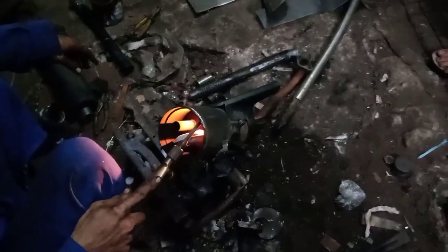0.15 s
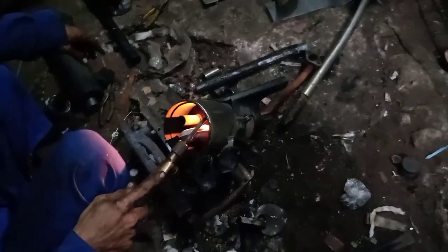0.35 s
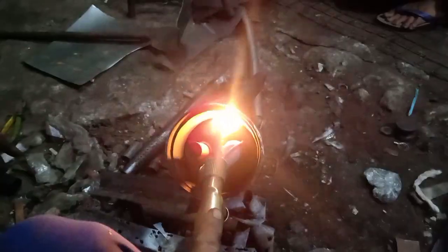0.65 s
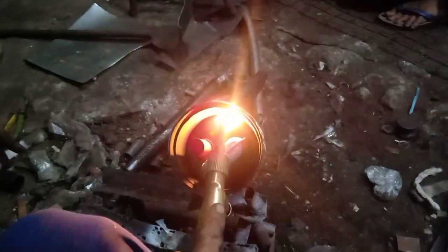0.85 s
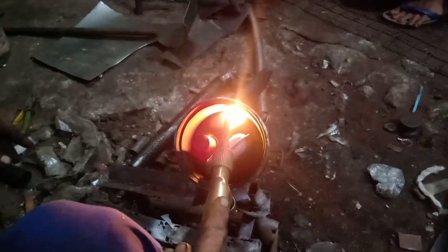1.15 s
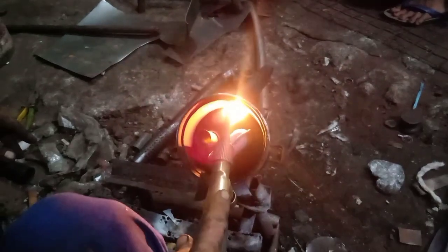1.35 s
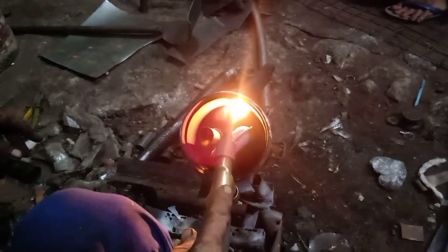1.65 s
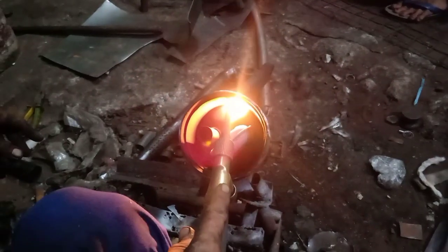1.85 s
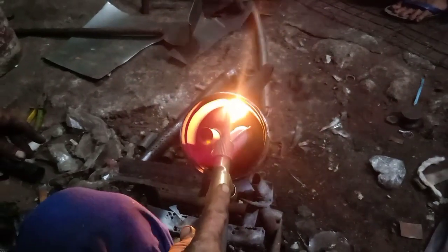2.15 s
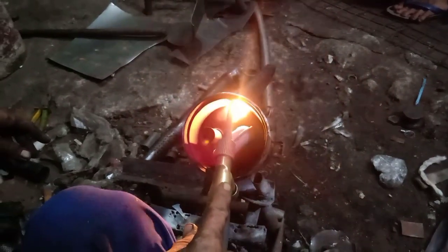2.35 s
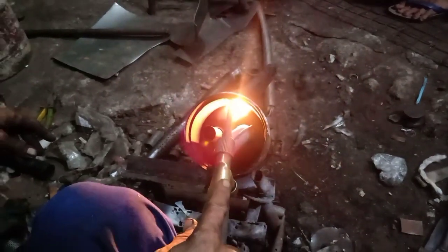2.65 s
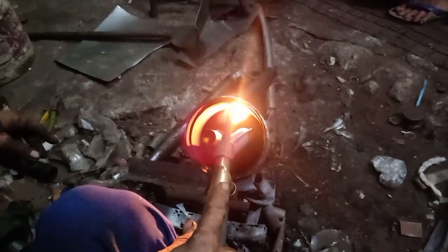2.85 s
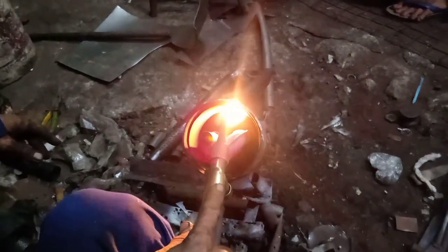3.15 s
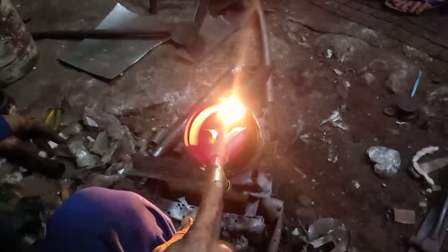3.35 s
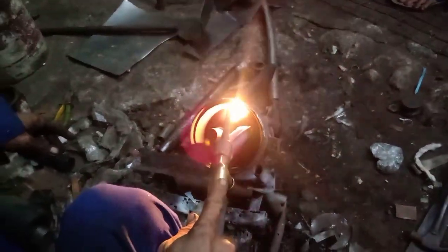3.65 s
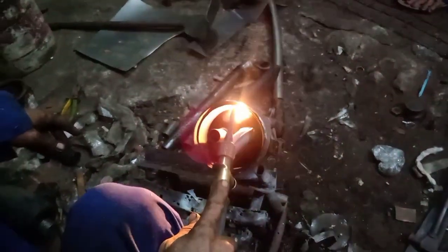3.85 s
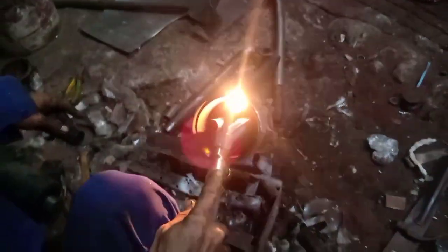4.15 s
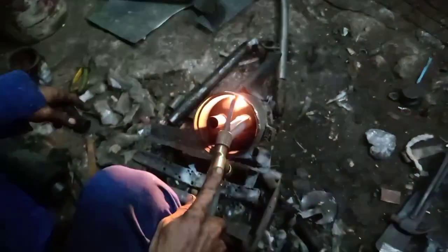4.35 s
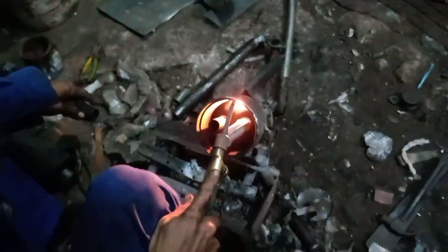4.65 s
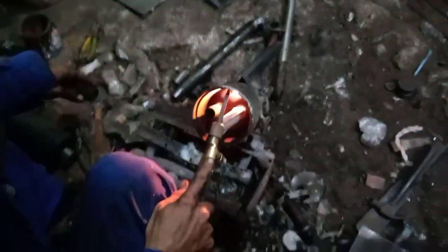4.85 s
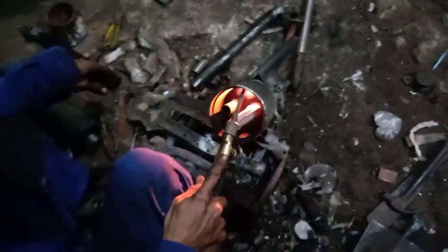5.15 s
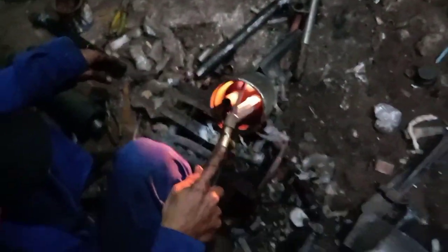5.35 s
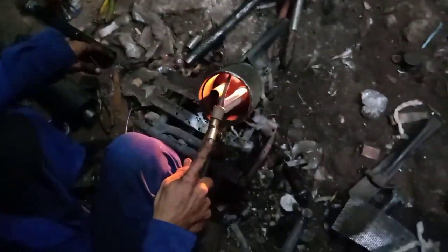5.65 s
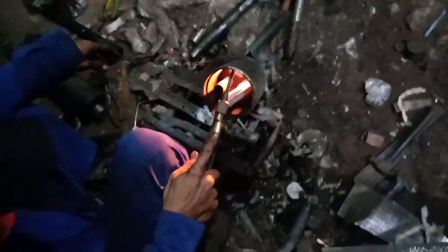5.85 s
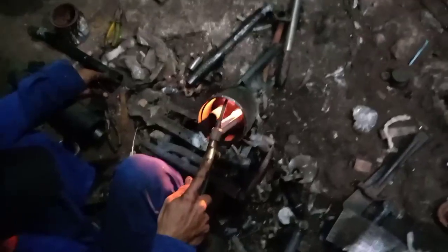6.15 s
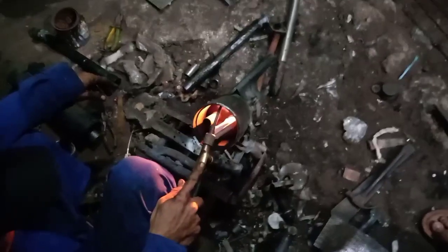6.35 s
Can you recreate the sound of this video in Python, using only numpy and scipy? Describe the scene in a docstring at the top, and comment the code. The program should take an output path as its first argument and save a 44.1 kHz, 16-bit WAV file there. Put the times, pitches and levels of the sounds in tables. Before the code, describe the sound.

Hard hammer blows on a pipe begin almost at once and continue to the end, cracking, ringing briefly and shaking loose sheet metal, with a quick wall echo. Behind them a nearby torch hisses and resonates inside a can, stronger after an abrupt change near 0.7 seconds, softer later. A faint low drone swells beneath; a stereo microphone hears the small hard workshop.

```python
"""A hammer beats a steel pipe among loose sheet metal, a few metres from a stereo microphone. Each blow is
a sharp sine crack, a wall's answer, decaying modes of pipe, sheet and bench, and a clatter of fading noise.
Close by, a gas torch blows into an open steel can: noise through the can's hollow resonances, with jet and
nozzle hiss above. Narrow bands of noise make a low drone with a broad hum under it all. Torch and drone dip
just before some blows. A light tick and, later, a soft low knock of two modes are decaying sines."""
import sys
import numpy as np
from scipy import signal
from scipy.fft import rfft, irfft, next_fast_len
from scipy.io import wavfile
from scipy.ndimage import uniform_filter1d, map_coordinates

SR = 44100
rng = np.random.default_rng(int(sys.argv[2]) if len(sys.argv) > 2 else 0)


def dump(signal):
    """Clip the signal to [-1, 1] and save it as 16-bit WAV at the path in sys.argv[1]."""
    limited = np.clip(np.atleast_2d(signal).T, -1, 1)
    pcm = np.round(limited * 32767).astype(np.int16)
    wavfile.write(sys.argv[1], SR, pcm)


N = 286209

# Hammer blows: start_s, crack_db, crack_hz, wall_db (the wall's answer), clatter_db, body_db, thud_db, ring_db,
# spot (struck place, share of the pipe's length), hardness_db_per_octave (tilt of the ring)
HAMMER_BLOWS = [(0.256, 1, 2280, -14, -13, -19.5, -23, -17, 0.23, 1),
                (0.638, -4.5, 2410, -13, -19.5, -27, -38.5, -15, 0.405, 2),
                (0.9667, -11, 2246, -6.5, -10.5, -18, -25.5, -12.5, 0.43, -2.5),
                (1.3457, -9.5, 2110, -9, -11.5, -21.5, -29.5, -12.5, 0.37, -2),
                (1.918, -10, 2090, -21, -11, -18, -21.5, -14.5, 0.37, -1),
                (2.3214, -20, 2130, -10, -10.5, -19, -21, -16.5, 0.42, 5.5),
                (2.7176, -7, 1643, -5, -14.5, -18, -21, -17, 0.35, -0.3),
                (3.068, -10, 1630, -5.5, -13, -18, -21.5, -18, 0.24, 3),
                (3.496, -4.5, 1704, -6, -11.5, -18, -22.5, -16, 0.2, 6.5),
                (4.197, -6, 2200, -5.5, -14, -22, -28, -15.5, 0.18, 3.5),
                (4.623, -9, 2370, -12, -13.5, -23, -28, -11.5, 0.15, -3),
                (5.0161, -9.5, 1750, -24, -15, -21.5, -30, -16.5, 0.33, -3),
                (5.4335, -4, 1902, -9, -13, -18.5, -24.5, -14, 0.43, -2),
                (5.851, -6.5, 1780, -8, -13.5, -15.5, -26.5, -17.5, 0.27, 2.5),
                (6.249, 0, 2130, -10.5, -13, -19.5, -25, -14.5, 0.3, -1)]
# Modes of the struck pipe: mode_hz, level_db, t60_s, phase_wander_rad
PIPE_MODES = [(928, -3.5, 0.23, 0.52), (2229, 0.5, 0.27, 1.3), (3017, -3, 0.24, 1.25),
              (3866, -12.5, 0.26, 1.5), (4857, -8, 0.22, 0.23), (5767, -19, 0.24, 2.5)]
# Modes of the loose sheet: mode_hz, level_db (over the body)
SHEET_MODES = [(326, -12), (612, -17.5), (671, -10.5), (1590, -8.5), (13840, -35)]
# What the pipe rests on, two rings and a short thump: mode_hz, level_db (over the thud), t60_s
BENCH_MODES = [(191.8, -3, 0.38), (216, 0, 0.058), (227, -10.5, 0.41)]
# Loose metal in the shop, four ranges, each a t60_s and a spectrum of: frequency_hz, density_db (per Hz)
THUD_RANGE = 0.24, [(80, -74), (150, 0), (215, -1), (280, -3.5), (420, -32)]
BODY_RANGE = 0.31, [(190, -27), (340, -8.5), (700, -8.5), (1250, -10.5), (1700, -96)]
CLATTER_RANGE = 0.24, [(900, -21), (1650, 4), (2250, 0), (3150, -8), (3450, -19.5), (4500, -67)]
TREBLE_RANGE = 0.27, [(2800, -63), (3600, -0.5), (5000, 0.5), (6200, -7), (9700, -28), (13500, -10.5),
                (16000, -39)]
# A light tick, the hammer grazing the pipe before a blow, then a soft low knock of two modes, something soft
# set down far off; each row is one decaying mode: start_s, pitch_hz, level_db, attack_s, t60_s
LIGHT_KNOCKS = [(1.913, 2030, -19, 0.00074, 0.023), (6.439, 456, -30, 0.011, 0.12),
                (6.446, 312, -34, 0.012, 0.13)]
# How hard the torch blows: time_s, jet_level_db
TORCH_JET = [(0.02, -45), (0.4, -47), (0.52, -40), (0.62, -47.5), (0.69, -35.5), (0.755, -34), (0.775, -43),
             (0.825, -37), (0.85, -30.5), (0.94, -36), (1.16, -36), (1.19, -42.5), (1.22, -35.5),
             (1.33, -36), (1.56, -41), (1.95, -38), (3.05, -39), (3.36, -37), (4.16, -43.5), (5.3, -47),
             (5.64, -44.5), (5.82, -49.5), (6.05, -49.5), (6.21, -45.5), (6.47, -49.5)]
# Nozzle hiss: time_s, level_db (over the jet)
NOZZLE_HISS = [(0, -7.5), (0.85, -7), (2.1, -5.5), (3.6, -2.5), (4.4, -6.5), (6.47, -5)]
# The can's song as the flame's place changes: time_s, roar_db (at the usual jet level),
# upper_db (lift of the upper notes over the roar), strongest_note_hz, top_note_db (lift over the upper notes)
CAN_SONG = [(0, -31, 1.5, 2158, 4), (0.6, -34, 0, 2137, 0.5), (0.9, -36, 4, 2100, 1.5),
            (1.6, -36, 4.5, 2126, 3.5), (2.2, -38, 4, 2151, 3.5), (3.9, -33.5, -1, 2170, 3),
            (4.6, -33.5, 3.5, 2157, 1), (5.7, -33, -1.5, 2140, 6.5), (6.1, -27.5, 2.5, 2124, 2.5)]
# Air modes of the can: mode_hz, width_hz, level_db
CAN_MODES = [(741, 30, -6), (964, 265, -3.5), (1153, 59, -1.5), (1842, 56, -4), (2154, 162, 5),
             (2850, 77, -18)]
# Spectra of the flame's broad roar, the jet and the nozzle: frequency_hz, density_db (per Hz)
FLAME_SPECTRUM = [(200, -14.5), (600, -19), (1500, -14), (3000, -9.5), (4500, -65)]
JET_SPECTRUM = [(2600, -65), (3500, -4), (4550, -7), (4780, 0.5), (5150, -2.5), (6000, -0.5), (6600, -7),
                (9800, -28)]
NOZZLE_SPECTRUM = [(6500, -64), (8300, -3.5), (9800, -8.5), (11300, -0.5), (13800, 0.5), (16000, -2)]
# Swells of the drone: time_s, low_tone_db, high_tone_db
DRONE_LEVELS = [(0.0, -52, -74), (1.01, -43, -45.5), (1.21, -75, -68), (1.45, -45, -64), (2.08, -55.5, -51),
                (3.988, -49, -66), (5.25, -75, -52), (6.49, -49, -66)]
# The drone's fuzzy tones: pitch_hz, width_hz
DRONE_TONES = [(74.5, 2.5), (98, 26)]
# Spectrum of the broad hum: frequency_hz, density_db (per Hz)
HUM_SPECTRUM = [(42, -56), (56, -4.5), (190, 1.5), (330, -21.5), (500, -32.5)]
# Dips of torch and drone: start_s (of the blow), depth_db
BACKGROUND_DIPS = [(0.634, -12.5), (1.347, -6), (4.198, -8.5), (5.015, -7.5), (5.428, -8.5), (6.249, -6.5)]
# Stereo width of the noises: frequency_hz, likeness (left-right correlation)
STEREO_LIKENESS = [(60, 0.97), (300, 0.95), (640, 0.5), (1400, 0.0033), (15000, 0.0074)]
# Colour of the microphone pair: frequency_hz, left_over_right_db
PAIR_COLOUR = [(200, -0.5), (1000, 1), (2400, 2), (4500, -5.5), (8500, 1), (14000, -1.5)]

CUT_SHORT_S = .668  # the sound of the second blow breaks off abruptly here
AT_NODE = 0.27  # share of a mode's swing that a blow on its node still wakes
DETUNE = 0.0024  # typical share by which the pipe's modes shift with the grip, from blow to blow
LOW_SWELLS_S = 0.019  # build-up time constant of the pipe's lowest mode
SHEET_T60_S, SHEET_VARIES_DB = 0.32, 3.5  # decay; typical spread from blow to blow
TREBLE_DB, SPLASH_DB = -1.5, 5  # treble over the high modes; splash over the treble
UPPER_HZ, TOP_NOTE_HZ = 1600, 2560  # where the can's upper notes and its top note begin
USUAL_JET_DB = -38
ROAR_FOLLOWS, UPPER_FOLLOWS = 0.68, 0.6  # dB of roar, and further dB of upper notes, per dB of jet
TOP_HZ = 15600  # nothing passes above this


def amp(db):
    """Gain of a level in dB."""
    return 10 ** (np.asarray(db) / 20)


def unit(x):
    """Scale to rms 1."""
    return x / np.sqrt(np.mean(x ** 2) + 1e-20)


def along(points, hz):
    """Read (Hz, value) points on a log frequency axis."""
    f, value = np.transpose(points)
    return np.interp(np.log(hz + 1), np.log(f + 1), value)


def curves(rows):
    """One value per sample for each column after the time."""
    s, *columns = np.transpose(rows)
    return [np.interp(np.arange(N) / SR, s, column) for column in columns]


def wobble(rate, channels=1):
    """Smooth random curves, rate knots a second."""
    knots = rng.standard_normal((channels, int(N * rate / SR) + 4))
    return np.array([map_coordinates(k, [np.arange(N) * rate / SR]) for k in knots])


def filtered(x, response):
    """Multiply the spectrum of x by a function of frequency."""
    m = next_fast_len(x.shape[-1] + 8192)
    spectrum = rfft(x, m) * response(np.fft.rfftfreq(m, 1 / SR))
    return irfft(spectrum, m)[..., :x.shape[-1]]


def shaped(spectrum):
    """Gain against frequency from (Hz, dB) points."""
    return lambda hz: amp(along(spectrum, hz))


def rush(gain, patchy_db, size=8):
    """Stereo noise of rms 1, coloured by gain(hz), with random louder and softer patches size frames long."""
    z = signal.stft(rng.standard_normal((2, N)), nperseg=512)[2]
    across_hz = uniform_filter1d(rng.standard_normal(z.shape[1:]), size=4, axis=0)
    patches = uniform_filter1d(across_hz, size=size, axis=1)
    pair = signal.istft(z * amp(patchy_db * unit(patches)), nperseg=512)[1][:, :N]

    def mid_side_gain(hz):
        # this split of mid and side gives the wanted likeness
        turn = np.arccos(np.clip(along(STEREO_LIKENESS, hz), -1, 1)) / 2
        return gain(hz) * [np.cos(turn), np.sin(turn)]

    mid, side = filtered(pair, mid_side_gain)
    return unit(np.array([mid + side, mid - side]))


def late_falling_db(t, t60):
    """Clatter and sheet fade slowly at first, then faster."""
    return -60 * (t / t60) ** 1.168


def crack_and_wall(t, lags, late, crack_db, crack_hz, wall_db):
    """A sine under a sharp pulse, answered by a wall that smears it."""
    def crack(u, life):
        return np.sin(2 * np.pi * crack_hz * u) * (u / life * np.exp(1 - u / life)) ** 3

    direct = amp(crack_db) * crack(np.maximum(t - lags[:, :1], 0), 0.00081)
    return direct + amp(wall_db) * crack(late, 0.0015)


def pipe_strength_db(ring_db, spot, hard):
    """Level of each pipe mode: weak when struck near its node, tilted by the hardness of the contact."""
    hz, mode_db = np.transpose(PIPE_MODES)[:2, :, None]
    order = np.arange(len(PIPE_MODES))[:, None] + 1
    woken = np.sin(np.pi * order * spot) ** 2 + AT_NODE ** 2
    return ring_db + mode_db + hard * np.log2(hz / hz[1]) + 10 * np.log10(woken)


def pipe_ring(t, strength_db, early):
    """Pipe modes roughened by room echoes: their size and phase wander, the two sides a quarter turn apart."""
    hz, _, t60, wander = np.transpose(PIPE_MODES)[..., None]
    knots = rng.standard_normal((2, 2, len(PIPE_MODES), 40))
    size, turn = np.apply_along_axis(lambda k: np.interp(t, np.linspace(0, t[-1], len(k)), k), -1, knots)
    eighth_turns = np.array([[[np.pi / 4]], [[-np.pi / 4]]])
    apart = rng.choice([-1, 1], (len(PIPE_MODES), 1)) * eighth_turns
    swing = amp(5.4 * size)
    # the wander leaves each mode's early strength alone
    swing /= np.sqrt(np.mean(swing[..., early] ** 2, axis=(0, 2), keepdims=True))
    shifted_hz = hz * (1 + DETUNE * rng.standard_normal(hz.shape))
    level = amp(strength_db - 60 * (t / t60) ** 1.27)
    modes = swing * level * np.sin(2 * np.pi * shifted_hz * t + apart + wander * turn)
    modes[:, 0] *= 1 - np.exp(-t / LOW_SWELLS_S)
    return modes.sum(1) * (1 - np.exp(-t / 0.00048))


def clatter(t, fill, at, levels_db, ranges, early):
    """Loose metal: noise in four ranges that fills up and fades, with a bright splash of steel on steel."""
    sound = 0
    for db, (t60, noise) in zip(levels_db, ranges):
        piece = noise[:, at:at + len(t)]
        sound = sound + amp(db + late_falling_db(t, t60)) * fill * piece / np.std(piece[:, early])
    treble_db, treble_noise = levels_db[-1], ranges[-1][1]
    splash = treble_noise[:, at + SR // 2:at + SR]  # a later stretch of the treble noise
    return sound + amp(treble_db + SPLASH_DB - 60 * t / 0.052) * fill * splash


def sheet(t, fill, body_db):
    """Sheet modes, shaken differently by every blow and heard in another phase on each side."""
    hz, mode_db = np.transpose(SHEET_MODES)[..., None]
    luck = rng.standard_normal((3, len(SHEET_MODES), 1))
    level_db = body_db + mode_db + SHEET_VARIES_DB * luck[0] + late_falling_db(t, SHEET_T60_S)
    modes = amp(level_db) * np.sin(2 * np.pi * hz * t + 1.13 * luck[1:])
    return fill * modes.sum(1)


def bench(t, thud_db):
    """Decaying low modes of what the pipe rests on."""
    hz, db, t60 = np.transpose(BENCH_MODES)[..., None]
    modes = amp(thud_db + db - 60 * t / t60) * np.sin(2 * np.pi * hz * t)
    return modes.sum(0) * (1 - np.exp(-t / 0.0026))


def hammer():
    """Each blow cracks, echoes off a wall, rings pipe, sheet and bench, and sets the shop clattering."""
    out, t = np.zeros((2, N + SR)), np.arange(SR // 2) / SR
    early = slice(0, SR // 20)
    ranges = []
    for t60, spectrum in (CLATTER_RANGE, THUD_RANGE, BODY_RANGE, TREBLE_RANGE):
        noise = rush(shaped(spectrum), patchy_db=2)
        ranges.append((t60, np.pad(noise, ((0, 0), (0, SR)))))
    for s, crack_db, crack_hz, wall_db, clatter_db, body_db, thud_db, ring_db, spot, hard in HAMMER_BLOWS:
        at = round(s * SR)
        lags = rng.uniform(0, [.0001, .00015], (2, 2))  # s: paths to the two sides differ
        late = np.maximum(t - .0098 - lags[:, 1:], 0)  # s since the wall's answer
        # the clatter starts weak and fills up when the wall has answered
        fill = 0.53 * (1 - np.exp(-t / 0.0004)) + 0.31 * (1 - np.exp(-late / 0.0002))
        strength_db = pipe_strength_db(ring_db, spot, hard)
        treble_db = np.mean(strength_db[3:5]) + TREBLE_DB  # a blow that rings high also splashes high
        blow = crack_and_wall(t, lags, late, crack_db, crack_hz, wall_db)
        blow += pipe_ring(t, strength_db, early)
        blow += clatter(t, fill, at, (clatter_db, thud_db, body_db, treble_db), ranges, early)
        blow += sheet(t, fill, body_db)
        blow += bench(t, thud_db)
        if s < CUT_SHORT_S < s + .1:
            blow *= np.clip((CUT_SHORT_S - s - t) / 0.00095, 0, 1)
        out[:, at:at + len(t)] += blow
    return out[:, :N]


def tick_and_knock():
    """A light tick, then a soft low knock of two modes; each row is one decaying mode."""
    s, hz, db, attack, t60 = np.transpose(LIGHT_KNOCKS)[..., None]
    t = np.maximum(np.arange(N) / SR - s, 0)
    modes = amp(db - 60 * t / t60) * np.sin(2 * np.pi * hz * t)
    return (modes * (1 - np.exp(-t / attack))).sum(0)


def hollow(hz):
    """Gain of the can: resonant peaks of its air modes joined with the flame's broad roar."""
    peaks = sum(amp(2 * db) / (1 + (2 * (hz - c) / w) ** 2) ** 2 for c, w, db in CAN_MODES)
    return np.sqrt(peaks + amp(2 * along(FLAME_SPECTRUM, hz)))


def can_roar(jet_db):
    """The flame's turbulence sounds the can's air modes, whose upper notes glide and swell."""
    _, upper_db, note_hz, top_db = curves(CAN_SONG)
    roar = rush(hollow, patchy_db=2.0)
    upper = filtered(roar, lambda f: 1 / (1 + (UPPER_HZ / (f + 1)) ** 8))
    lifted = upper + (amp(top_db) - 1) * filtered(upper, lambda f: f > TOP_NOTE_HZ)
    # faster playing lifts all upper notes alike
    strongest_hz = max(CAN_MODES, key=lambda mode: mode[2])[0]
    played = np.cumsum(note_hz) / strongest_hz
    moved = np.array([map_coordinates(side, [played], mode="mirror") for side in lifted])
    upper_level_db = upper_db + UPPER_FOLLOWS * (jet_db - USUAL_JET_DB) + 1.95 * wobble(9)
    # the lifted notes are subtracted from the roar and the moved notes added
    return roar - lifted + amp(upper_level_db) * moved


def torch():
    """The can roars with the flame's turbulence; jet and nozzle hiss above it."""
    jet_db, = curves(TORCH_JET)
    hiss_db = jet_db + curves(NOZZLE_HISS)[0]
    roar_db = curves(CAN_SONG)[0] + ROAR_FOLLOWS * (jet_db - USUAL_JET_DB)
    flutter = wobble(25)  # the flame front flaps
    # the roar leans 3 dB to the right
    sound = amp(roar_db + 0.52 * flutter) * can_roar(jet_db) * amp([[-1.5], [1.5]])
    # the jet's colour drifts slowly
    sound += amp(jet_db + 0.2 * flutter) * rush(shaped(JET_SPECTRUM), patchy_db=2.0, size=40)
    return sound + amp(hiss_db) * rush(shaped(NOZZLE_SPECTRUM), patchy_db=2.5)


def drone():
    """Two fuzzy low tones, narrow bands of noise, come and go over a broad hum."""
    sound = amp(-48.0) * rush(shaped(HUM_SPECTRUM), patchy_db=4.0)
    for db, (hz, width) in zip(curves(DRONE_LEVELS), DRONE_TONES):
        sound += amp(db) * rush(lambda f: 1 / (1 + (2 * (f - hz) / width) ** 2), patchy_db=1.5)
    return sound


def dips():
    """Background gain: it starts to sink 26 ms before some blows and is back 6 ms after they start."""
    t = np.arange(N) / SR
    shape = [-.026, -.016, 0, .006], [0, 1, 1, 0]  # s from the blow, share of the depth
    return amp(sum(db * np.interp(t - s, *shape) for s, db in BACKGROUND_DIPS))


def scene():
    """All sources at the microphone."""
    return hammer() + tick_and_knock() + (torch() + drone()) * dips()


def record(dry):
    """The two sides differ in colour, peaks are rounded softly, deep bass and all above TOP_HZ are lost."""
    sides = filtered(dry, lambda hz: amp(along(PAIR_COLOUR, hz) * np.array([[.5], [-.5]])))
    soft = sides / (1 + np.abs(sides / .98) ** 6) ** (1 / 6)
    return filtered(soft, lambda hz: (hz < TOP_HZ) / (1 + (40 / (hz + 1)) ** 5))


dry = scene()
out = record(dry)
dump(out)
```